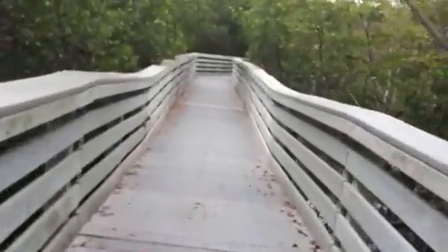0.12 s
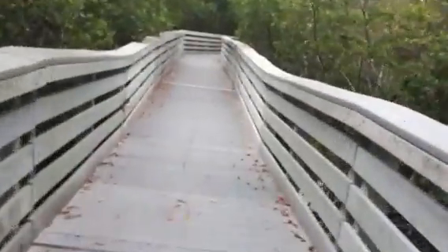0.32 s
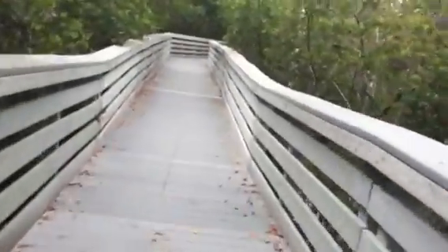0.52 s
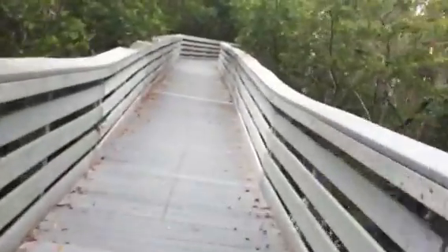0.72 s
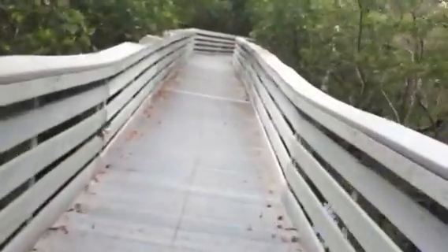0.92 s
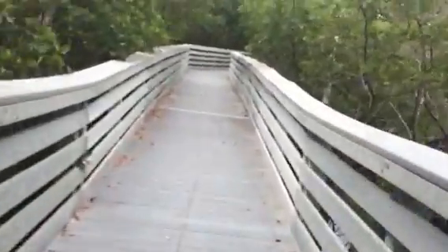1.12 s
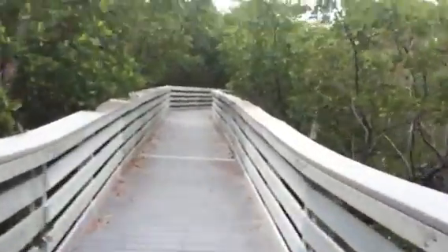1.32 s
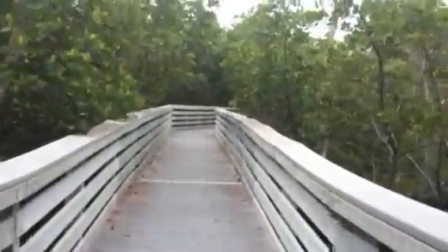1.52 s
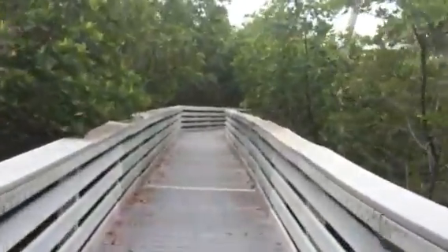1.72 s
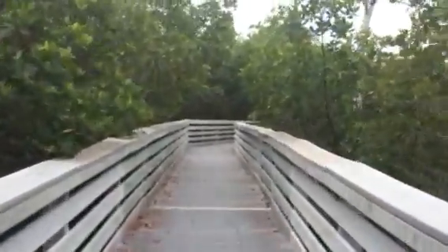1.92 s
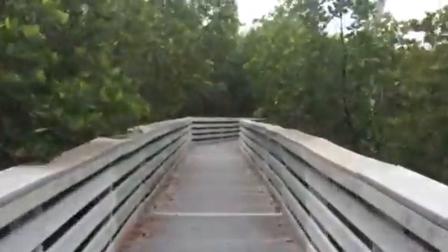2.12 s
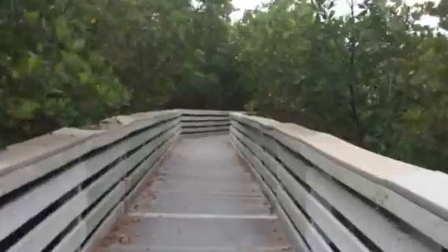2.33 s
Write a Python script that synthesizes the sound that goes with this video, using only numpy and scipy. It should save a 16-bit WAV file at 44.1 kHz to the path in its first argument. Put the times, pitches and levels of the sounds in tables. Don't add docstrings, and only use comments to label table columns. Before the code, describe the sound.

Low, uneven bicycle tyre rumble on a wooden boardwalk, a dry twig cracking loudly early on

```python
import sys
import numpy as np
from scipy import signal
from scipy.fft import rfft, irfft, next_fast_len
from scipy.io import wavfile
from scipy.ndimage import uniform_filter1d, map_coordinates

SR = 44100
rng = np.random.default_rng(int(sys.argv[2]) if len(sys.argv) > 2 else 0)


def natural_amplitude(level_db):
    exponent = np.asarray(level_db, float) / 20
    return 10 ** exponent


def int16_out(signal):
    q = np.round(np.clip(np.atleast_2d(signal).T, -1, 1) * 32767)
    wavfile.write(sys.argv[1], SR, q.astype(np.int16))


N = 105840

# (time [s], rattle peak level [dB])
EARLY_GAPS = [(0.0376, -51), (0.0883, -51.5), (0.139, -53.5), (0.1877, -53.5), (0.2763, -50),
              (0.3222, -48.5), (0.3592, -48.5), (0.408, -49), (0.4892, -50), (0.5335, -48), (0.5763, -50),
              (0.62, -51.5), (0.6726, -50.5), (0.7252, -51.5), (0.773, -50), (0.8136, -52.5),
              (0.855, -56.5), (0.8932, -58), (0.9388, -52), (0.9857, -53.5), (1.038, -56.5),
              (1.0764, -50.5), (1.1312, -50), (1.179, -49.5)]
# (time [s], rattle peak level [dB])
LATE_GAPS = [(1.2126, -47), (1.2274, -52), (1.2657, -47.5), (1.3169, -47.5), (1.3672, -48.5),
             (1.4078, -50.5), (1.4253, -54), (1.4715, -51), (1.5223, -53), (1.5655, -53), (1.6199, -50),
             (1.6716, -55), (1.723, -55.5), (1.7806, -60.5), (1.8342, -55.5), (1.8799, -55.5),
             (1.9199, -57), (1.9599, -51), (2.0005, -53), (2.0438, -52.5), (2.0901, -50.5), (2.142, -48.5),
             (2.1899, -50), (2.2358, -50.5), (2.2803, -49.5), (2.3203, -51.5), (2.361, -50),
             (2.3944, -63.5)]


def unit(x):
    return x / np.sqrt(np.mean(x ** 2) + 1e-20)


def along(points, hz):
    f, v = np.transpose(points)
    return np.interp(np.log(hz + 1), np.log(f + 1), v)


def wobble(rate):
    knots = rng.standard_normal(int(N * rate / SR) + 4)
    return map_coordinates(knots, [np.arange(N) * rate / SR])


def filtered(x, response):
    m = next_fast_len(N + SR // 2)
    return irfft(rfft(x, m) * response(np.fft.rfftfreq(m, 1 / SR)), m)[..., :N]


def resonances(table):
    def response(f):
        total = 0
        for k, (centre, width, db) in enumerate(table):
            damping = 1j * f * width
            total = total + (-1) ** k * natural_amplitude(db) * damping / (centre * centre - f * f + damping)
        return total
    return response


def noise(spectrum):
    return unit(filtered(rng.standard_normal(N), lambda hz: natural_amplitude(along(spectrum, hz))))


def burst(s, db, t60, rise_s):
    t = np.maximum(np.arange(N) / SR - s, 0)
    return natural_amplitude(db - 60 * t / t60) * (1 - np.exp(-t / rise_s))


def ring(s, db, modes, rise_s):
    t = np.arange(N) / SR
    out = np.zeros(N)
    for hz, level, t60 in modes:
        wander = 0.45 * wobble(200)
        out += burst(s, db + level, t60, rise_s) * np.sin(2 * np.pi * hz * t + wander)
    return out


def cracks(rows, colour, rise_s, grain_db):
    envelope = sum(burst(*row, rise_s) for row in rows)
    return envelope * noise(colour) * natural_amplitude(grain_db * wobble(900))


def tyres():
    # (time [s], level [dB])
    roll = [(0, -41), (.13, -47.5), (.19, -46), (.39, -43.5), (.57, -49), (.7, -44.5), (.8, -46),
            (1.02, -49.5), (1.18, -46), (1.4, -46.5), (1.5, -48.5), (1.59, -48.5), (1.64, -55),
            (1.78, -51.5), (2.0, -50), (2.22, -48), (2.3, -50), (2.4, -45)]
    # (frequency [Hz], width [Hz], level [dB])
    deck_modes = [(59.3, 20, -5), (89, 22, -7), (140.4, 22, -3), (195, 31, -3)]
    # (frequency [Hz], density [dB per Hz])
    rumble_colour = [(12, -53), (20, -24), (42, -6), (65, -3), (113, -6.5), (178, -5), (235, -14.5),
                     (325, -26.5), (450, -25), (580, -56), (990, -120)]
    # (time [s], level before the soft rise [dB], pitch [Hz])
    bump_hits = [(0, -30, 75), (.04, -32, 70), (.185, -33, 185), (.326, -27, 180), (.362, -33, 150),
                 (.37, -31, 95), (.616, -33, 160), (.672, -30, 72), (.706, -31, 70), (.755, -34, 62),
                 (.785, -34, 170), (.8, -34, 65), (1.1, -36, 170), (1.155, -33, 90), (1.188, -29, 70),
                 (1.252, -29, 88), (1.29, -29, 88), (1.326, -32, 78), (1.354, -27, 75), (1.385, -34, 160),
                 (1.43, -35, 85), (1.505, -35, 175), (1.572, -33, 70), (1.655, -33, 88), (1.8, -35, 75),
                 (1.985, -35, 85), (2.055, -36, 70), (2.115, -35, 80), (2.205, -35, 65), (2.238, -27, 78),
                 (2.31, -34, 78)]
    t = np.arange(N) / SR
    s, load_db = np.transpose(roll)
    load = natural_amplitude(np.interp(t, s, load_db))

    pushes = np.zeros(N + SR)
    lag_s, scatter_db, push_hz = 0.006, 3.5, 307
    for at, _ in EARLY_GAPS + LATE_GAPS:
        pushes[round((at + lag_s) * SR)] = natural_amplitude(scatter_db * rng.standard_normal())
    deck = resonances(deck_modes)
    thumps = unit(filtered(pushes[:N], lambda f: deck(f) / (1 + 1j * f / push_hz) ** 4))

    bumps = np.zeros(N)
    for at, db, hz in bump_hits:
        bumps += burst(at, db, t60=0.085, rise_s=0.006) * np.sin(2 * np.pi * hz * (t - at))
    rumble = noise(rumble_colour) * natural_amplitude(0.54 * wobble(14))
    return load * natural_amplitude(-0.12) * unit(rumble + natural_amplitude(-6) * thumps) + bumps


def chain():
    # (frequency [Hz], density [dB per Hz])
    rattle_colour = [(1200, -38), (2500, 3), (5000, -7), (8000, -1), (10000, 1.5), (12500, -5),
                     (15000, -2.5)]
    shake = sum(burst(s, db - 3, t60=0.057, rise_s=0.0023) for s, db in EARLY_GAPS + LATE_GAPS)
    z = signal.stft(noise(rattle_colour), nperseg=256)[2]
    field = uniform_filter1d(rng.standard_normal(z.shape), size=10, axis=0)
    field = uniform_filter1d(field, size=8, axis=1)
    patchy = signal.istft(z * natural_amplitude(2.5 * unit(field)), nperseg=256)[1][:N]
    return shake * unit(patchy) * natural_amplitude(2.1 * wobble(600))


def litter():
    # (time [s], peak level [dB], T60 [s])
    snap = [
        (.2326, -14, .006),
        (.234, -26.5, .06),
        (.2408, -27, .03),
        (.246, -31, .02),
        (.219, -52, .2),
    ]
    # (frequency [Hz], density [dB per Hz])
    twig_colour = [(120, -48), (250, -7), (1090, -9), (1900, -6), (3360, -2), (5590, -10.5), (9000, -11.5),
                   (12500, -10.5), (15500, -16)]
    # (frequency [Hz], level [dB], T60 [s])
    twig_modes = [(711, -2, .09), (1114, -7, .15), (2815, -7, .1), (3284, -1, .13), (5028, -12, .15),
                  (12040, -20, .1), (13950, -16.5, .1)]
    # (time [s], peak level [dB], T60 [s])
    crunch = [
        (.41, -61, 0.095),
        (.4245, -46, 0.1),
        (.437, -39.5, 0.052),
        (.4495, -40, 0.045),
        (.46, -54.5, 0.31),
    ]
    # (frequency [Hz], density [dB per Hz])
    leaf_colour = [(350, -39), (600, -11.5), (979, -5), (1170, -9.5), (1930, -5), (3870, -5.5),
                   (5980, -4.5), (15500, -13.5)]
    # (time [s], peak level [dB], T60 [s])
    second_snap = [
        (1.562, -47.5, .04),
        (1.567, -38, 0.028),
        (1.575, -62, 0.28),
        (1.639, -54.5, 0.048),
    ]
    # (frequency [Hz], density [dB per Hz])
    second_colour = [(470, -58), (800, -19), (1450, -21), (2210, -7), (3100, -6), (4400, -4), (5500, -8.5),
                     (15500, -29.5)]
    # (frequency [Hz], level [dB], T60 [s])
    second_modes = [(3090, -6, .06), (3860, 4, .09), (4377, -2, .06), (5173, 4, .12), (6665, -8, .07),
                    (7515, -9, .07)]
    at = snap[0][0]
    first = cracks(snap, twig_colour, 0.0002, grain_db=1)
    first = first + ring(at + 0.01, -38.5, twig_modes, 0.004)
    stir = burst(at, -38, 0.16, 0.0015) + burst(at, -56.5, 0.94, 0.01)
    tail = stir * noise(leaf_colour)
    second = cracks(second_snap, second_colour, 0.00064, grain_db=1.0)
    second = second + ring(second_snap[1][0], -53, second_modes, 0.0011)
    leaves = cracks(crunch, leaf_colour, 0.0028, grain_db=1.5)
    return fibres() + first + tail + second + leaves


def fibres():
    # (time [s], level before the soft rise [dB], pitch [Hz])
    first_twig = [(.2326, -4, 3380), (.2327, -4.5, 4350), (.2340, -4, 3150), (.2346, -15, 900),
                  (.2408, -12, 4700), (.241, -11, 3450), (.2435, -15, 3300), (.2466, -14, 3400),
                  (.2471, -9, 3500), (.2328, -8, 6900), (.2328, -10, 9600), (.233, -6, 12300),
                  (.2415, -14, 12300), (.2336, -15, 2000)]
    # (time [s], level before the soft rise [dB], pitch [Hz])
    later_fibres = [(.4248, -34, 5600), (.432, -37, 5300), (.4398, -33, 6250), (.4415, -34, 7500),
                    (.4507, -30, 5850), (.4525, -33, 6100), (.4715, -34.5, 1720), (1.5625, -29, 3700),
                    (1.5641, -25, 3900), (1.5659, -25, 3000), (1.566, -23, 4100), (1.5675, -31, 5170),
                    (1.5686, -29, 3800), (1.5692, -31, 3200), (1.5712, -32, 4300), (1.7262, -41, 4350),
                    (1.7275, -45, 2800), (2.0135, -42, 3750), (2.016, -44, 5000)]
    t = np.arange(N) / SR
    out = np.zeros(N)
    for s, db, hz in first_twig + later_fibres:
        out += burst(s, db, 14 / hz, 1 / hz) * np.sin(2 * np.pi * hz * (t - s))
    return out


def loose_parts():
    # (time [s], low mode level [dB], high mode level [dB])
    jingle_hits = [
        (1.122, -53.5, -57),
        (1.131, -74.5, -60),
        (1.145, -54, -55),
        (1.212, -65, -56),
        (1.405, -64, -51),
        (1.423, -62, -66),
    ]
    # (frequency [Hz], T60 [s])
    steel = [(6600, .065), (12200, .045)]
    # (time [s], peak level [dB], pitch [Hz])
    click_hits = [(0.12, -46.5, 4150), (0.3565, -49.5, 5400), (0.622, -48.5, 1940), (1.0212, -47, 1900),
                  (1.123, -47.5, 1880), (1.404, -48.5, 1750), (1.726, -50, 4300), (1.798, -48, 1804),
                  (1.809, -51, 1820), (2.011, -45.5, 3700), (2.023, -50, 3750), (2.0432, -48, 2760),
                  (2.252, -49, 3740)]
    # (time [s], peak level [dB], T60 [s])
    knock_hits = [(.046, -49.5, 0.13), (.056, -53, 0.064), (.12, -51.5, 0.13), (.36, -51.5, 0.12),
                  (.51, -57.5, 0.24), (.575, -61, 0.34), (.815, -53.5, 0.27), (1.021, -50.5, 0.1),
                  (1.124, -56.5, 0.31), (1.211, -50, 0.072), (1.268, -56, 0.11), (1.6, -59.5, 0.12),
                  (1.64, -55.5, 0.13), (2.12, -54.5, 0.091)]
    # (frequency [Hz], density [dB per Hz])
    board_colour = [(300, -31), (600, 2.5), (1100, 0), (2200, -5.5), (4500, -14), (9000, -23.5)]
    out = np.zeros(N)
    for s, *levels in jingle_hits:
        modes = [(hz, db, t60) for (hz, t60), db in zip(steel, levels)]
        out += ring(s, 0, modes, 0.0014)
    for s, db, hz in click_hits:
        band = unit(filtered(rng.standard_normal(N), resonances([(hz, 0.3 * hz, 0)])))
        out += burst(s, db - 5, t60=0.039, rise_s=0.0014) * band
    return out + cracks(knock_hits, board_colour, 0.0037, grain_db=2.0)


def rails(x):
    t60 = 0.1
    length = SR // 4
    tail = natural_amplitude(-60 * np.arange(length) / SR / t60) * rng.standard_normal(length)
    delayed = np.pad(x, (200, 0))
    return signal.fftconvolve(delayed, tail / np.linalg.norm(tail))[:N]


def air():
    # (frequency [Hz], density [dB per Hz])
    air_colour = [(150, -23), (250, -2.5), (413, -13), (692, -14), (781, -14.5), (3890, -30.5),
                  (5220, -34.5), (10800, -32), (15500, -37.5)]
    level_db = -59.5 + 0.51 * wobble(2.3) + 0.49 * wobble(24)
    return natural_amplitude(level_db) * noise(air_colour)


def scene():
    near = litter() + loose_parts() + chain()
    return (near + natural_amplitude(-17.5) * rails(near) + tyres() + air())[None]


def low_pass(x):
    return signal.sosfilt(signal.butter(12, 16320, fs=SR, output="sos"), x)


def record(dry):
    low_hz, top_hz = 44, 15600

    def response(f):
        bass_cut = (1j * f / low_hz) ** 2 / (1 + 1.2j * f / low_hz - (f / low_hz) ** 2)
        return (f < top_hz) * bass_cut
    return low_pass(filtered(dry, response))


dry = scene()
out = record(dry)
int16_out(out)
```